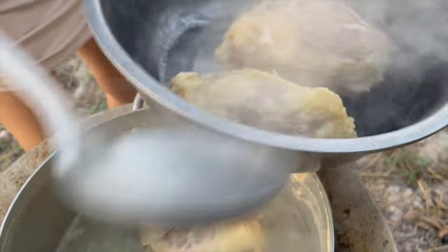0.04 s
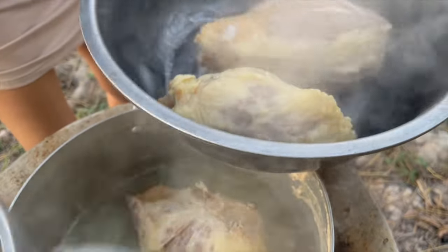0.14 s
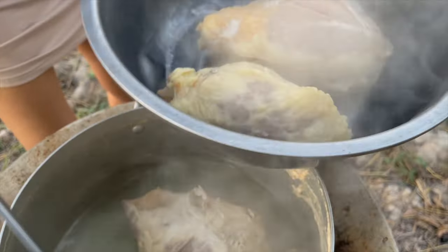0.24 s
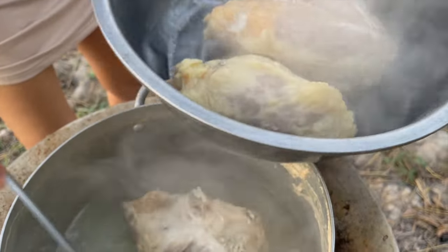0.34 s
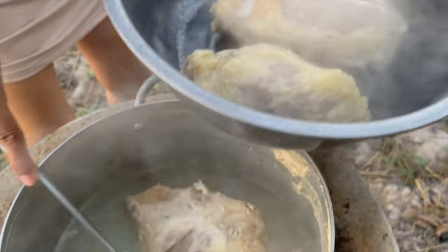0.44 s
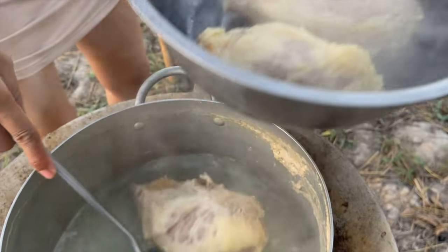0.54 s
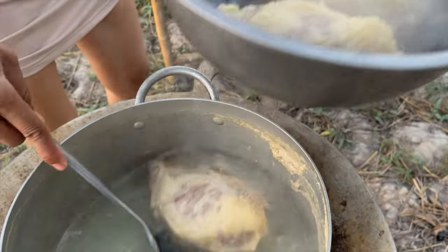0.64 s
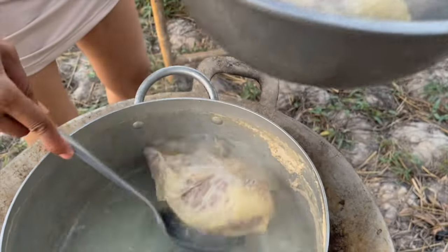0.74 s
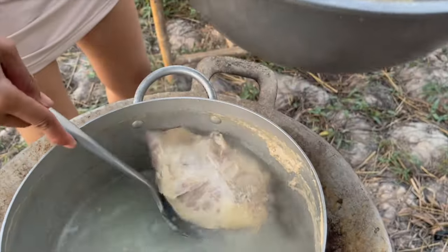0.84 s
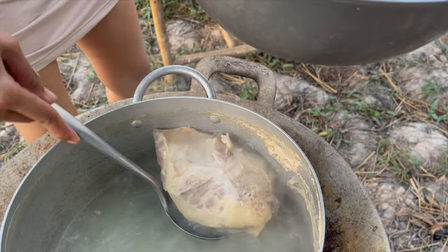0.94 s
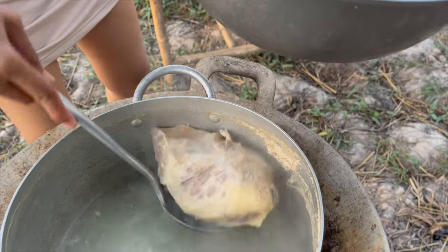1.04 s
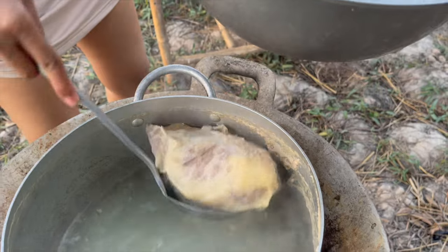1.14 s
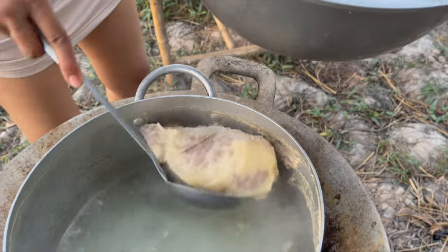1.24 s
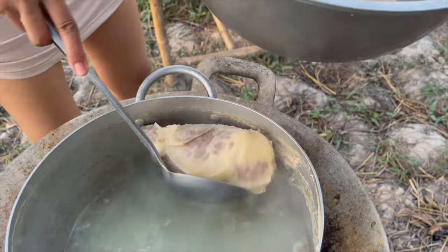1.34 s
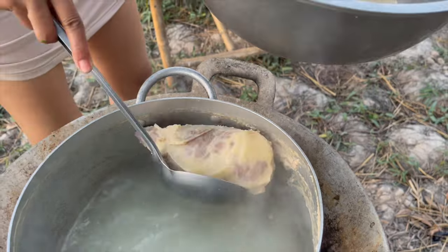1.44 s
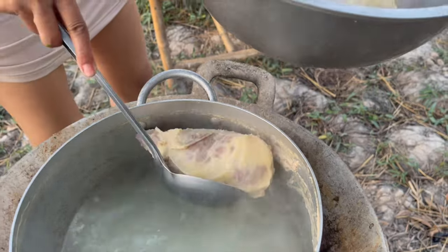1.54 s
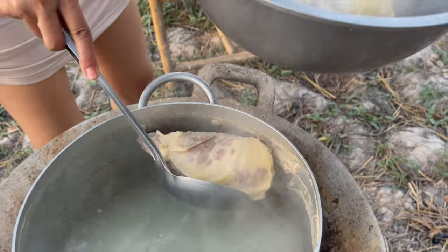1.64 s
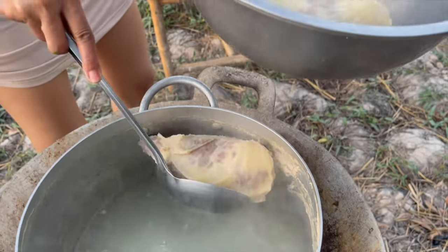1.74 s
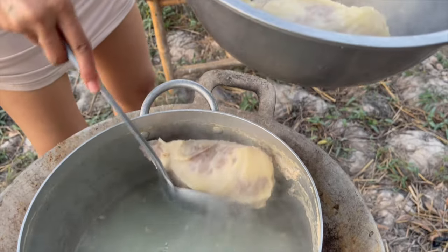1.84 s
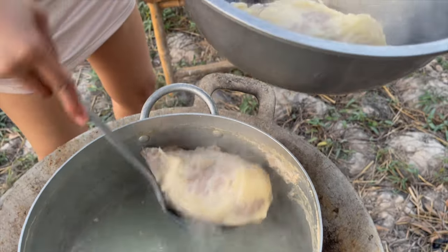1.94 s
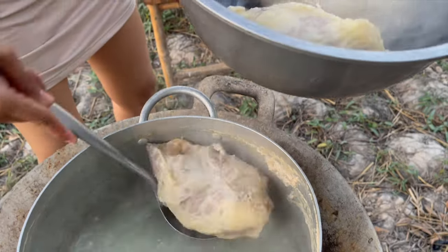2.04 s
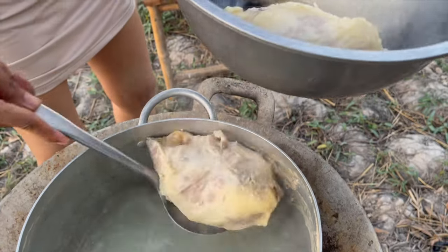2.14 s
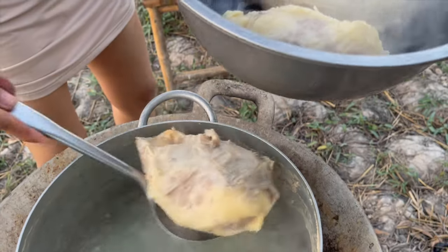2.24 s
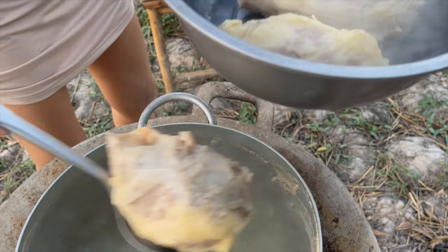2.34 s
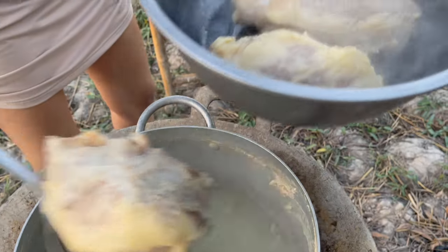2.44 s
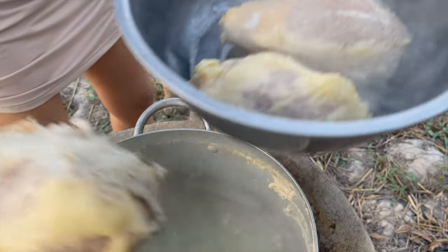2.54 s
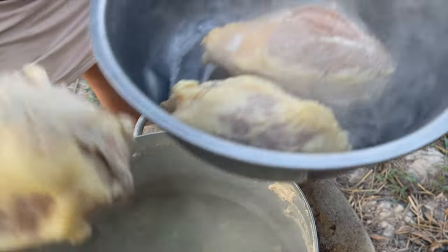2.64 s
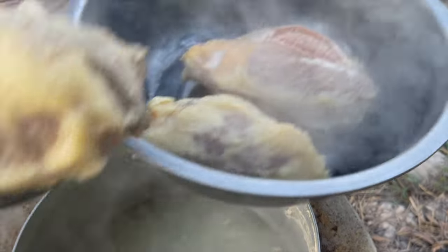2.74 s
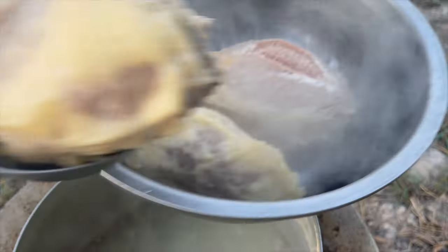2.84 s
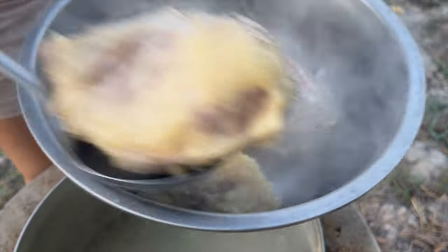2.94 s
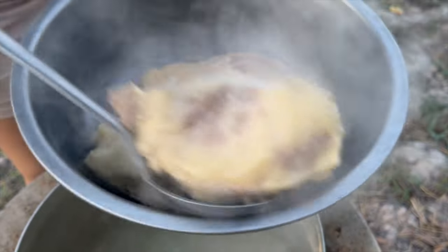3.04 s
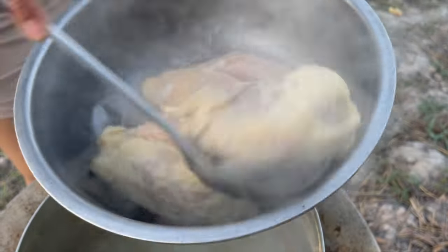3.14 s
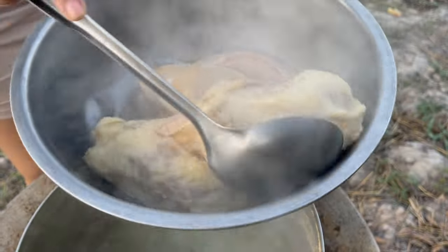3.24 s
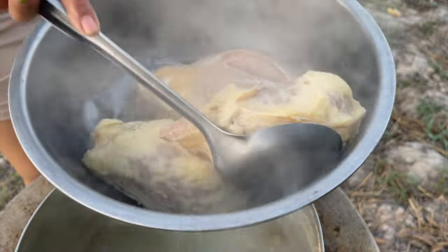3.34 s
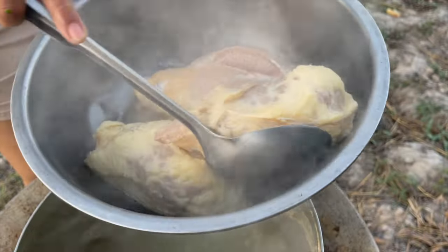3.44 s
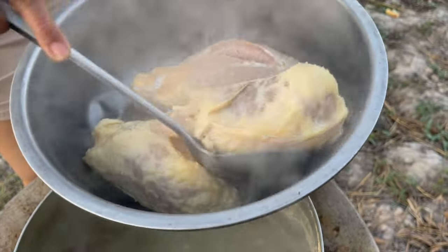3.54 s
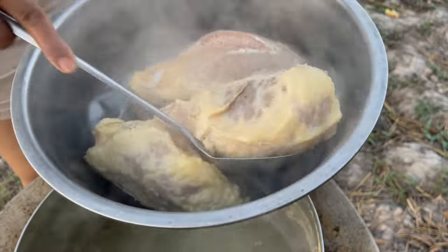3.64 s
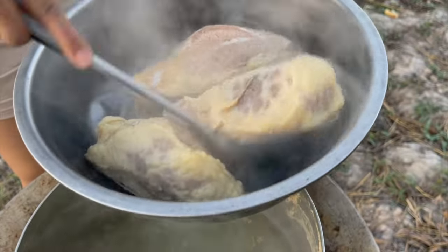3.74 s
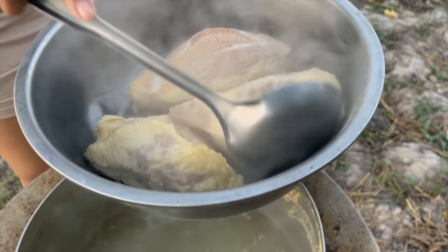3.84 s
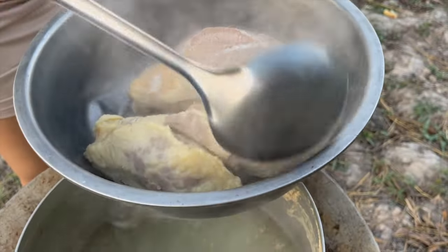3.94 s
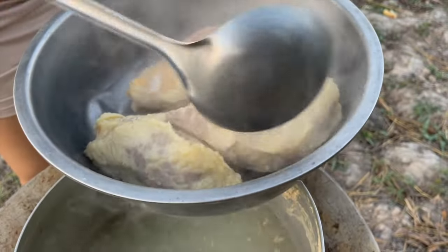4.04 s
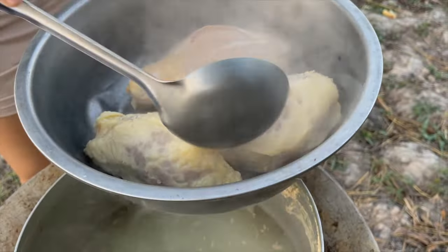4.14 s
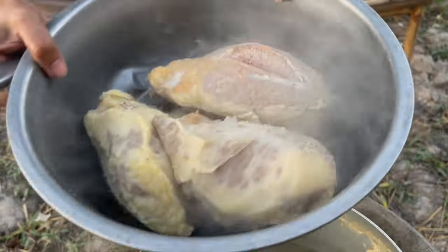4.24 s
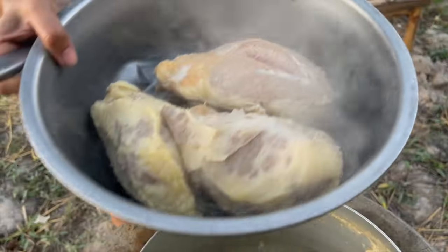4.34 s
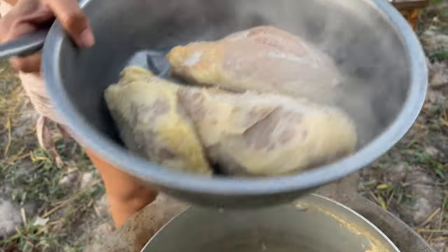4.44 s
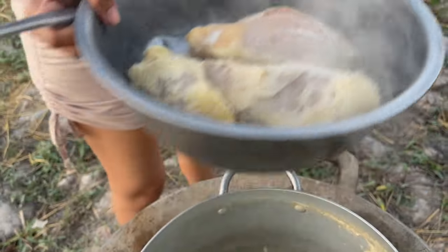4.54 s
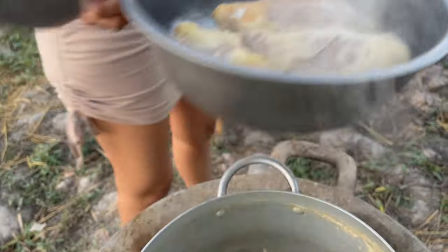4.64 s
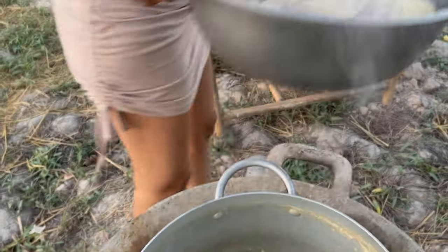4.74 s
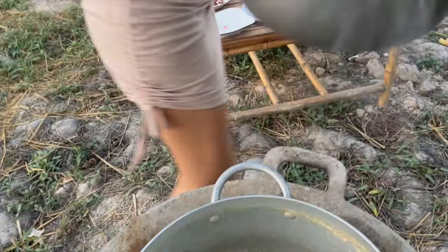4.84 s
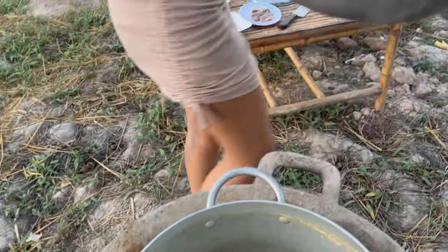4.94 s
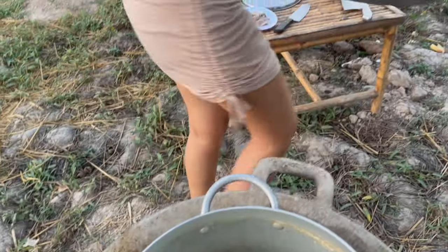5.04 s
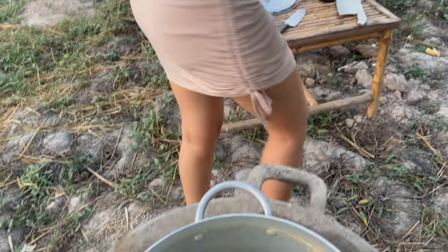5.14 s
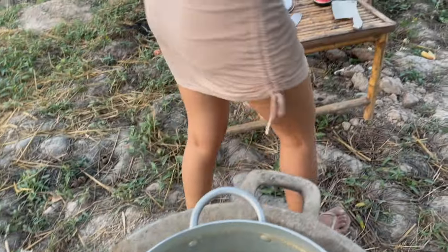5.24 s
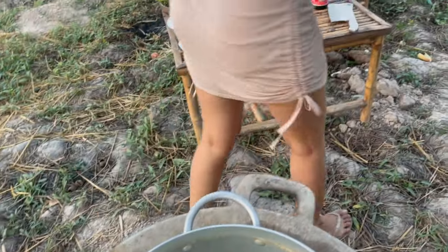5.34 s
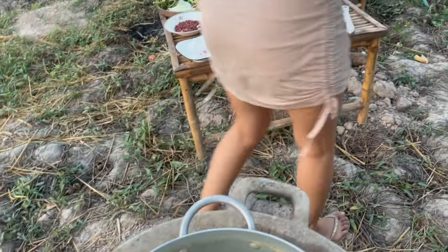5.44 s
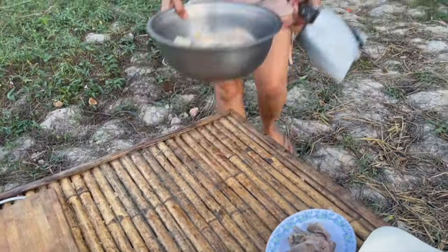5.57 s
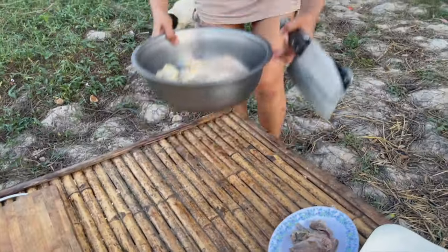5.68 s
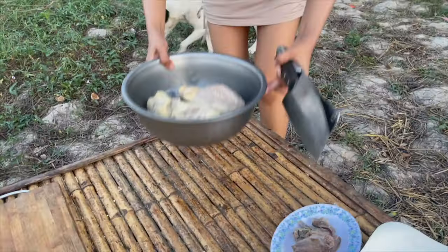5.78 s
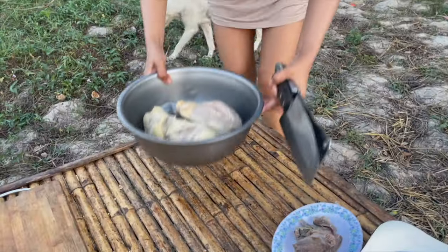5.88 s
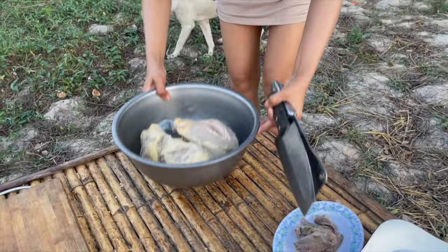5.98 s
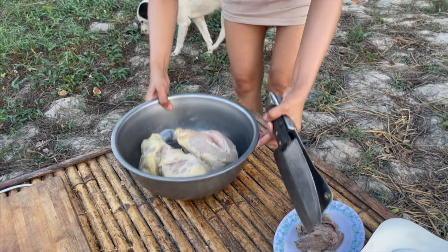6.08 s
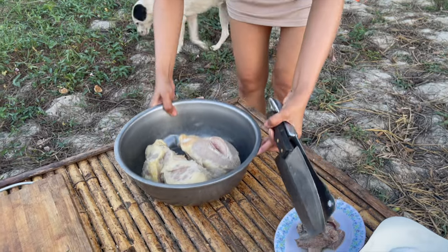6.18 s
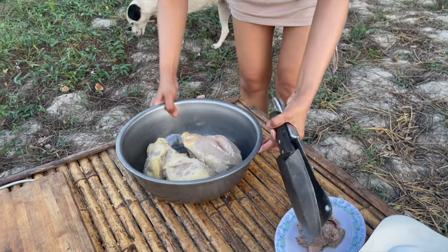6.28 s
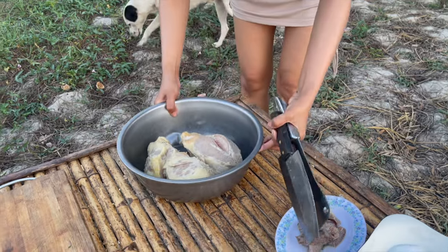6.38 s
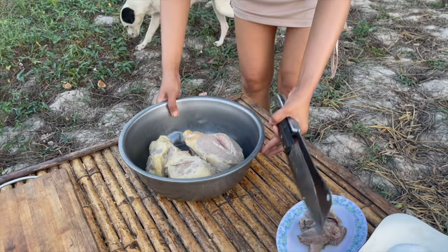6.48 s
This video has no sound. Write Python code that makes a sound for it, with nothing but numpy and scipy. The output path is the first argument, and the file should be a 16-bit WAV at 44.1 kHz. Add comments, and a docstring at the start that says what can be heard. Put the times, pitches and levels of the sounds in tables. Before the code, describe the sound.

In an open yard with shimmering insects, small birds and low rumble, a ladle touches a steel bowl, then stirs water with plopping bubbles and ticks on a pot wall. Drips sizzle briefly on a hot stove. Loud, meat-damped metal clonks and short scrapes follow, then soft crunching steps, an abrupt loss of background treble, and a bowl knocking down on bamboo. Close handheld phone, stereo.

```python
"""Outdoors, over insects, birds and a low rumble, a steel ladle touches a bowl, then fishes meat out of a pot:
it ticks on the pot wall while bubbles plop in stirred water, and soon drips spit and sizzle on the hot stove.
The ladle clonks into the steel bowl and skids, as noise, damped notes and ringing modes that the meat chokes;
sliding meat makes the bowl groan softly. Steps crunch on dry litter, the background's treble drops abruptly,
and the bowl is set on a bamboo table. A phone's two ports hear it; it limits loud knocks and ducks after them."""
import sys
import numpy as np
from scipy import signal
from scipy.fft import rfft, irfft, next_fast_len
from scipy.io import wavfile
from scipy.ndimage import uniform_filter1d, minimum_filter1d

SR = 44100
rng = np.random.default_rng(int(sys.argv[2]) if len(sys.argv) > 2 else 0)


def output_pcm(signal):
    """Save a mono or channel-first signal as 16-bit PCM at the path in sys.argv[1].

    Samples are clipped to [-1, 1] before scaling.
    """
    pcm = np.clip(np.atleast_2d(signal).T, -1, 1) * 32767
    wavfile.write(sys.argv[1], SR, np.round(pcm).astype(np.int16))


N = 287074
TIME = np.arange(N) / SR
AGE = TIME[:SR // 2]  # time since a blow
THROB_HZ = 135  # pulsing of the insect sounds


def undb(db):
    """Decibels to gain."""
    return 10 ** (np.asarray(db) / 20)


def unit(x):
    """Scale to rms 1."""
    return x / np.sqrt(np.mean(x ** 2))


def burst(x):
    """Scale a transient to the energy of 10 ms at rms 1."""
    return x / np.sqrt(np.sum(x ** 2) / (SR / 100))


def add(out, s, sound):
    """Mix a sound in at time s."""
    i = int(s * SR)
    out[i:i + len(sound)] += sound[:N - i]


def sine(hz):
    """Sine that follows a pitch given sample by sample."""
    return np.sin(2 * np.pi * np.cumsum(hz) / SR)


def fade(t60):
    """Exponential decay after a blow, 60 dB in t60 seconds."""
    return np.exp(-np.log(1000) * AGE / t60)


def envelope(s, attack_s, hold_s, t60):
    """Rise from time s, hold, then die away."""
    age = TIME - s
    decay = np.exp(-np.log(1000) * np.maximum(age - attack_s - hold_s, 0) / t60)
    return np.clip(age / attack_s, 0, 1) * decay


def over_hz(points, size):
    """A (Hz, value) table read on the bins of a transform, along log frequency."""
    hz, value = np.transpose(points)
    return np.interp(np.log(np.fft.rfftfreq(size, 1 / SR) + 1), np.log(hz), value)


def colour(x, points):
    """Causal minimum-phase filter with the given (Hz, dB) response, made by folding its cepstrum."""
    size = 2 * next_fast_len(len(x))
    cepstrum = irfft(np.log(undb(over_hz(points, size))))
    cepstrum[1:size // 2] *= 2
    cepstrum[size // 2 + 1:] = 0
    return irfft(rfft(x, size) * np.exp(rfft(cepstrum)))[:len(x)]


def band(x, hz, width):
    """Band-pass around hz."""
    low = np.hypot(hz, width / 2) - width / 2
    high = min(low + width, SR / 2 - 1000)
    return signal.sosfilt(signal.butter(2, [low, high], "band", fs=SR, output="sos"), x + 1e-18)


def walk(rate):
    """Slow random wander with rms 1, drawing new values rate times a second."""
    k = int(SR / rate)
    steps = np.repeat(rng.standard_normal(N // k + 1), k)
    return unit(uniform_filter1d(uniform_filter1d(steps, k), k)[:N])


def slips(rate, spread_db):
    """Tiny random contacts, rate a second, of uneven size."""
    happens = rng.random(N) < rate / SR
    return happens * rng.choice([-1, 1], N) * undb(spread_db * rng.standard_normal(N))


def outdoors():
    """Wavering rumble, open-air hiss and throbbing insect choruses; treble and choruses drop abruptly late on."""
    # Open air and distant rumble. Each row: frequency in Hz, colour in dB.
    air_colour = [(20, -41), (33, -19), (55, 2), (80, -0.5), (130, -8.5), (200, -19), (300, -21),
                  (500, -21), (1000, -29), (2000, -31.5), (5000, -34), (9000, -31), (12500, -61),
                  (14000, -64.5)]
    # Swells of the rumble below 130 Hz. Each row: time in seconds, gain in dB.
    rumble_swells = [(0, 2.5), (.9, 2), (1.5, 2.5), (1.8, -3.5), (2.1, 1), (2.7, -4), (3.1, -1.5), (3.4, 5),
                     (3.8, 2), (4.15, 1), (4.6, 0.5), (5.2, 0.5), (6.5, -1.5)]
    # Insect choruses. Each row: centre in Hz, width in Hz, level in dB, change in dB at the drop,
    # throb depth from 0 to 1.
    choruses = [(3214, 720, -71, -4.5, 0.05), (3470, 160, -75, -9, 0), (6660, 810, -71, -3, 0.02),
                (9000, 2200, -73, -5, 0.02), (10954, 810, -65.5, -8, 0.5)]
    drop_s, drop_length_s, air_db, air_change_db = 5.55, 0.0081, -52, -29
    dropped = np.clip((TIME - drop_s) / drop_length_s, 0, 1)

    air = undb(air_db) * unit(colour(rng.standard_normal(N), air_colour))
    high = signal.sosfilt(signal.butter(1, 3500, "high", fs=SR, output="sos"), air)
    low = signal.sosfiltfilt(signal.butter(2, 130, fs=SR, output="sos"), air)
    rumble = low * undb(np.interp(TIME, *np.transpose(rumble_swells)))
    out = (air - high - low + rumble) * undb(walk(8))  # wavers by about 1 dB
    out += high * undb(air_change_db * dropped)

    throb = sine(THROB_HZ * (1 + .03 * walk(5.6)))
    for hz, width, db, change_db, depth in choruses:
        level = undb(db + change_db * dropped + 0.98 * walk(4.6))
        out += level * (1 + depth * throb) * unit(band(rng.standard_normal(N), hz, width))
    return out


def far_birds(db, hz, spread_hz, fall_hz, length_s, count=16):
    """Random far calls as rows of start in seconds, length in seconds, start Hz, end Hz, level in dB."""
    rows = []
    for a, b, c, d in rng.random((count, 4)):
        start_hz = hz + spread_hz * (2 * c - 1)
        rows.append((a * N / SR, length_s * (.5 + b), start_hz, start_hz - fall_hz * d, db))
    return rows


def wildlife():
    """Short gliding bird whistles, near and far, and insect buzzes as noise bands pulsed by the wingbeat."""
    # The nearest bird. Each row: start in seconds, length in seconds, start pitch in Hz, end pitch in Hz, peak in dB.
    near_chirps = [(0.934, 0.072, 3330, 3280, -66), (1.003, .04, 3950, 3680, -65),
                   (1.124, 0.072, 3790, 3590, -65), (1.305, .04, 2920, 2840, -66),
                   (1.447, 0.035, 1660, 1880, -56), (1.495, 0.053, 3500, 3280, -64),
                   (1.564, 0.095, 3270, 2890, -61.5), (1.731, 0.08, 3170, 2620, -59.5),
                   (3.827, 0.065, 3580, 3500, -58), (3.947, 0.127, 3400, 3250, -63),
                   (4.774, 0.07, 3330, 2920, -61), (5.786, 0.16, 3310, 3185, -63),
                   (6.225, 0.14, 3280, 3170, -64.5)]
    # Birds farther off: level in dB, middle pitch and spread either way in Hz, largest fall in Hz,
    # average length in seconds.
    far_calls = dict(db=-67, hz=3260, spread_hz=230, fall_hz=218.8, length_s=0.15)
    # Nearer insects. Each row: start in seconds, length in seconds, level in dB, centre in Hz, width in Hz.
    buzz_rows = [(0.572, 0.2, -63, 3520, 220), (1.53, 0.22, -60, 7400, 300), (1.883, 0.23, -59, 7420, 300)]
    buzz_depth = 0.62
    out = np.zeros(N)
    for s, length, start_hz, end_hz, db in near_chirps + far_birds(**far_calls):
        n = int(length * SR)
        whistle = sine(np.linspace(start_hz, end_hz, n))
        add(out, s, undb(db) * signal.windows.tukey(n, .7) * whistle)
    for s, length, db, hz, width in buzz_rows:
        n = int(length * SR)
        wingbeat = 1 + buzz_depth * np.sin(2 * np.pi * THROB_HZ * TIME[:n])
        buzz = unit(wingbeat * band(rng.standard_normal(n), hz, width))
        add(out, s, undb(db) * signal.windows.tukey(n, .6) * buzz)
    return out


def footsteps(rate=1000, spread_db=4.5):
    """Dry litter crunches under each step: small snaps over a soft rustle, swelling with the press of the foot."""
    # Each row: start in seconds, length in seconds, level in dB, centre in Hz.
    step_rows = [(4.452, 0.094, -55, 760), (5.04, 0.14, -60.5, 1390), (5.129, 0.074, -59.5, 1050),
                 (5.283, 0.069, -57.5, 2300), (5.436, 0.084, -65, 1570), (5.52, 0.38, -57.5, 1850),
                 (5.739, 0.061, -57, 600)]
    out = np.zeros(N)
    grains = unit(slips(rate, spread_db)) + rng.standard_normal(N)
    for s, length, db, hz in step_rows:
        press = np.sin(np.pi * np.clip((TIME - s) / length, 0, 1))
        out += undb(db) * press * unit(band(grains, hz, 0.78 * hz))
    return out


def crack(t60, snap_db=5, snap_t60=0.0013, tail_db=-35, tail_t60=0.49, rise=0.0012):
    """Countless dense modes as noise: a snap at contact, their decay, and faint scatter from the surroundings."""
    shape = fade(t60) + undb(snap_db) * fade(snap_t60) + undb(tail_db) * fade(tail_t60)
    return burst(rng.standard_normal(len(AGE)) * shape * (1 - np.exp(-AGE / rise)))


def ticks():
    """Small dull contacts: band-passed cracks."""
    # Light handling and dry litter underfoot. Each row: start in seconds, level in dB, centre in Hz, t60 in seconds.
    tick_rows = [(0.0885, -46.5, 10100, 0.011), (.303, -58, 10500, .015), (0.383, -55, 8000, 0.012),
                 (2.258, -58.5, 4800, 0.018), (3.816, -50, 2360, 0.12), (4.212, -47.5, 496, 0.0056),
                 (5.021, -41.5, 1090, 0.038), (5.022, -51, 2070, 0.024), (5.105, -54.5, 1200, .03),
                 (5.152, -53, 1400, 0.037), (5.158, -53.5, 649, .04), (5.318, -55.5, 2300, .015),
                 (5.455, -56.5, 1510, .02), (5.722, -56, 2204, .02), (5.52, -61, 1390, .015)]
    out = np.zeros(N)
    for s, db, hz, t60 in tick_rows:
        add(out, s, undb(db) * burst(band(crack(t60), hz, 0.59 * hz)))
    return out


def stove(grain_db=3.0):
    """Drips spit on hot metal as sharp cracks; a dribble boils away in a fine crackle and dries."""
    # The loudest spits. Each row: start in seconds, level in dB before the colour and make-up gain.
    spit_rows = [(2.751, -35), (2.7735, -40), (2.823, -41.5), (2.8554, -39.5), (2.878, -38.5)]
    # Colour of spits and sizzle. Each row: frequency in Hz, gain in dB.
    sizzle_colour = [(200, -21.5), (1000, -18), (2500, -12), (5000, -5), (7000, -5.5), (8200, 1),
                     (11500, -8), (13500, -13.5), (16000, -28.5)]
    makeup_db = 8.5
    # level before colour and make-up
    boil = undb(-38.5) * envelope(2.735, attack_s=0.029, hold_s=0.014, t60=0.31)
    out = boil * unit(rng.standard_normal(N) * undb(grain_db * walk(900)))
    for s, db in spit_rows:
        add(out, s, undb(db) * crack(0.0049))
    return undb(makeup_db) * colour(out, sizzle_colour)


def small_bubbles(from_s, to_s, db, hz, spread_octaves, count=26):
    """Random bubbles as rows of start in seconds, level in dB, pitch in Hz."""
    return [(from_s + (to_s - from_s) * a, db + 4 * (2 * b - 1), hz * 2 ** (spread_octaves * (2 * c - 1)))
            for a, b, c in rng.random((count, 3))]


def water(cycles=9, glide=0.2, splash_db=-14):
    """Bubbles ring for a few cycles and rise in pitch over the soft wash of stirred water."""
    # Larger air pockets closing around the ladle. Each row: start in seconds, level in dB, starting pitch in Hz.
    plop_rows = [(.329, -38.5, 410), (0.382, -32.5, 504), (.426, -36, 402), (.677, -45.5, 430),
                 (.835, -26, 1350), (.937, -38.5, 1280), (0.965, -38, 974), (1.016, -41.5, 1070),
                 (1.031, -38.5, 523), (1.057, -32.5, 884), (1.063, -35, 1350), (1.088, -48.5, 1880),
                 (1.138, -47, 1050), (1.15, -39.5, 1240), (1.162, -35.5, 646), (1.259, -51, 1550),
                 (1.399, -51, 1230), (1.99, -49, 1250)]
    # Small bubbles while the ladle is under water: first and last time in seconds, middle level in dB,
    # middle pitch in Hz, spread either way in octaves.
    bubble_cloud = dict(from_s=0.12, to_s=1.2, db=-48.5, hz=946, spread_octaves=1.1)
    # Strokes of the ladle through the water. Each row: strongest push in seconds, level in dB.
    stroke_rows = [(.21, -51.5), (.58, -57.5)]
    rise_s, stroke_t60, hiss_db = 0.17, 1.22, -6
    out = np.zeros(N)
    for s, db, hz in plop_rows + small_bubbles(**bubble_cloud):
        t60 = cycles / hz + 0.015
        pitch = hz * (1 + glide * np.minimum(AGE / t60, 1))
        bubble = sine(pitch) * fade(t60) * (1 - np.exp(-AGE / 0.00055))
        splash = burst(band(crack(0.0094), 0.84 * hz, 0.82 * hz))
        add(out, s + 0.00117, undb(db) * (bubble + undb(splash_db) * splash))
    stir = sum(undb(db) * envelope(s - rise_s, rise_s, 0, stroke_t60) for s, db in stroke_rows)
    wash = unit(band(rng.standard_normal(N), 370, 570) * undb(3.7 * walk(65.3)))
    hiss = unit(band(rng.standard_normal(N), 4200, 6900))
    return out + stir * (wash + undb(hiss_db) * hiss)


def sheet(t60, count=90, stretch=0.91):
    """The crowded upper modes of thin metal, each dying at its own pace."""
    age = AGE[:SR // 6]
    hz = rng.uniform(900, 12500, count)
    pace = np.exp(0.2 * rng.standard_normal(count))
    sign = rng.choice([-1., 1.], count)
    decays = np.exp(np.outer(-np.log(1000) * pace / (stretch * t60), age))
    waves = decays * np.sin(2 * np.pi * np.outer(hz, age))
    return burst(np.pad(sign @ waves, (0, len(AGE) - len(age))))


def note(hz, db, swell_s, swell_power, sag=.03):
    """A strongly damped note that swells and dies, the sooner the higher it is; its pitch sags as contact eases."""
    swell_fall = 0.6  # swell_s holds at 500 Hz and shortens with pitch by this power
    u = AGE / (swell_s * (500 / hz) ** swell_fall)
    pitch = hz * (1 + sag * np.tanh(1 - u / 2))
    return undb(db) * (u * np.exp(1 - u)) ** swell_power * sine(pitch)


def ring(modes, db, tilt_db, woken, scatter_db=2.5, split=0.006, twin_db=-10, wobble=0.0055, rattle_db=2.0):
    """Free ring as decaying modes, each with a beating twin as in dented round metal."""
    chance = rng.standard_normal((len(modes), 3))
    # the pressure on the struck thing wavers, and pitch and level with it
    press = np.interp(AGE, np.linspace(0, AGE[-1], 70), rng.standard_normal(70))
    clock = AGE + wobble * np.cumsum(press) / SR
    out = 0
    for (hz, mode_db, t60), (a, b, c) in zip(modes, chance):
        if hz in woken:  # the struck spot sets these modes' level, in step with the push
            size_db, sign = woken[hz], 1
        else:  # tilt_db is per octave above 1500 Hz
            size_db = db + mode_db + scatter_db * a + tilt_db * np.log2(max(hz / 1500, 1))
            sign = np.sign(c)
        twin = np.sin(2 * np.pi * (hz * (1 + split * b) * AGE + c))
        pair = np.sin(2 * np.pi * hz * clock) + undb(twin_db) * twin
        out = out + undb(size_db) * fade(t60) * sign * pair
    return out * undb(rattle_db * press)


def choke(s):
    """What is left of a sound begun at s as ladle or meat comes to rest on the steel and damps it."""
    # Each row: time of coming to rest in seconds, t60 of the damping in seconds.
    rests = [(3.084, 0.17), (3.165, 0.23), (3.522, 0.109), (3.765, 0.26)]
    left = np.ones(len(AGE))
    for rest_s, t60 in rests:
        if rest_s > s:
            left = left * np.exp(-np.log(1000) * np.maximum(s + AGE - rest_s, 0) / t60)
    return left


def blows(hits, contact_colour, vessel, swell_power, metal, ladle_db=None, hardness=0.23):
    """Each contact: its noise, two strongly damped notes, and the ring of vessel and perhaps ladle."""
    # Ring of the ladle. Each row: mode in Hz, relative level in dB, t60 in seconds.
    ladle = [(304, -11.5, 0.056), (400, -4.5, 0.17), (463, -10, 0.15), (491, -5, .12), (657.4, -7, 0.097),
             (785, -8.5, .09), (877, -4, .14), (976, -5.5, 0.12), (1044, -5.5, .11), (1220, -10.5, .11),
             (1683, -13.5, 0.11), (1835, -13, 0.095), (1940, -17, .13), (2110, -17, .09), (2350, -13, .08),
             (2775, -21, 0.21), (3100, -20.5, .13), (3700, -19.5, .08), (4490, -22.5, 0.083),
             (4850, -19.5, 0.13), (5080, -19, .1), (5631, -13.5, 0.092), (5929, -16, .1),
             (6230, -16.5, 0.11), (7200, -20.5, 0.083), (8035, -17.5, 0.064)]
    bright_from_hz, bright_full_hz = 750, 5700  # a harder contact lifts the treble over this range
    out = np.zeros(N)
    mode_hz = np.array([mode[0] for mode in (vessel if ladle_db is None else vessel + ladle)])
    for s, db, bright_db, t60, note_hz, note_db, swell_s, second_hz, second_db, vessel_db, spot in hits:
        contact = np.sqrt(1 - metal) * crack(t60) + np.sqrt(metal) * sheet(t60)
        contact = colour(contact, contact_colour)
        contact = colour(contact, [(bright_from_hz, db), (bright_full_hz, db + bright_db)])
        clonk = note(note_hz, note_db, swell_s, swell_power) + note(second_hz, second_db, swell_s, swell_power)
        # each frequency of the struck spot wakes the nearest mode
        woken = {mode_hz[np.argmin(np.abs(mode_hz - hz))]: size_db for hz, size_db in spot}
        # a hard, bright contact wakes more of the high modes
        tilt_db = hardness * (bright_db + np.interp(bright_full_hz, *np.transpose(contact_colour)))
        ringing = ring(vessel, vessel_db, tilt_db, woken)
        if ladle_db is not None:  # out of the water the ladle rings too, following the contact's level
            ringing = ringing + ring(ladle, db + ladle_db, tilt_db, woken)
        add(out, s, clonk + (contact + ringing) * choke(s))
    return out


def bowl_on_table():
    """The bowl is set down on bamboo: mostly noisy contacts over short, low slat modes."""
    # Each row: start in seconds, contact level in dB, brightness in dB, contact t60 in seconds, note in Hz,
    # note level in dB, note swell in seconds at 500 Hz, second note in Hz, its level in dB, slat ring in dB,
    # then the modes the struck spot wakes most as pairs of Hz and dB.
    table_hits = [(6.061, -42, -15, .03, 1440, -43, 0.0074, 300, -49.5, -69.5, []),
                  (6.0675, -28, -13, 0.025, 1126, -31.5, 0.0032, 2130, -40, -63, []),
                  (6.1595, -21, 12, 0.033, 188.4, -25.5, 0.0029, 684, -22, -53, []),
                  (6.1675, -19.5, 7, 0.031, 2150, -25, 0.0027, 218, -23.5, -37, []),
                  (6.181, -16, 7.5, 0.048, 240, -28, 0.0023, 2070, -32, -34.5, []),
                  (6.193, -15.5, -4, 0.056, 203, -28, 0.0032, 860, -28, -41.5, [(557, -32.5)]),
                  (6.275, -29.5, -3.5, 0.054, 683, -33.5, 0.0054, 242, -43, -49.5, [(1540, -48),
                  (1950, -44), (3270, -46)])]
    # Contact noise. Each row: frequency in Hz, gain in dB.
    table_colour = [(70, -15.5), (270, 3), (1150, -4), (3100, -9), (5700, -22), (9800, -30.5), (12300, -42),
                    (14000, -63)]
    # Bamboo slats. Each row: mode in Hz, relative level in dB, t60 in seconds.
    slats = [(205, 11, 0.079), (246, 7, 0.089), (560.4, -2, 0.18), (648, -0.5, 0.18), (790, 10, 0.065),
             (984, 0.5, 0.12), (1550, -11, 0.15), (1950, 4, 0.057), (2300, -0.5, 0.047), (3290, 0, 0.057)]
    return blows(table_hits, table_colour, slats, swell_power=1.0, metal=0.072)


def ladle_on_pot():
    """The ladle ticks on the pot wall: short contacts wake the pot's modes."""
    # Each row: start in seconds, contact level in dB, brightness in dB, contact t60 in seconds, note in Hz,
    # note level in dB, note swell in seconds at 500 Hz, second note in Hz, its level in dB, pot ring in dB,
    # then the modes the struck spot wakes most as pairs of Hz and dB.
    pot_hits = [(.498, -32.5, 11, 0.021, 3500, -34, 0.0027, 760, -45, -52, [(710, -30), (1598, -44),
                (3394, -39), (3510, -28.5)]), (.507, -32, -5, 0.02, 3360, -29, .003, 327, -45, -62, []),
                (.8212, -31, -1.5, 0.016, 3660, -25.5, 0.0018, 940, -42, -45, []),
                (.866, -23, -3, 0.031, 4450, -16.5, 0.0032, 1430, -27, -40, [(627, -36.5), (2790, -41),
                (3020, -30.5)]), (1.2955, -45, -5, 0.015, 1310, -41.5, 0.0024, 2120, -45, -62, []),
                (1.953, -54, -3, .02, 1500, -53, 0.0067, 4300, -60, -71, []),
                (2.007, -30.5, 9, 0.031, 1464, -25.5, 0.0048, 6640, -18, -48, [(1480, -28), (4470, -34),
                (5046, -28), (6600, -29.5)]),
                (2.029, -33, -1, 0.049, 1340, -43, 0.0034, 4430, -38, -54, [(6600, -35)])]
    # Contact noise. Each row: frequency in Hz, gain in dB.
    pot_colour = [(70, -21), (270, 5), (1150, 0), (3100, -5), (5700, 0.5), (9800, -4), (12300, -14),
                  (14000, -27.5)]
    # Pot wall. Each row: mode in Hz, relative level in dB, t60 in seconds.
    pot_modes = [(606, -5, 0.088), (700, -4, 0.094), (1125, 4.5, 0.108), (1484, -29, 0.086),
                 (1590, -11.5, 0.23), (2790, -13, 0.12), (3024, 4.5, 0.049), (3397, -5, 0.052),
                 (3510, -20.5, 0.089), (3973, 8.5, 0.04), (4480, -4, 0.083), (5113, 4, .065),
                 (6740, -19, 0.031)]
    return blows(pot_hits, pot_colour, pot_modes, swell_power=0.84, metal=0.29)


def scrapes(rate=900, spread_db=4, hz=6400, width_hz=3200, t60=0.063):
    """The ladle skids on the bowl: stick and slip keep the thin metal's upper modes going."""
    # Each row: start in seconds, length in seconds, level in dB, fall over the skid in dB.
    skid_rows = [(3.046, 0.051, -32.5, 13), (3.729, 0.042, -43.5, -3), (3.878, 0.033, -37.5, 6.5)]
    out = np.zeros(N)
    chatter = band(signal.fftconvolve(slips(rate, spread_db), sheet(t60))[:N], hz, width_hz)
    for s, length, db, fall_db in skid_rows:
        skid = chatter[int(s * SR):int((s + length) * SR)]
        fall = undb(np.linspace(0, -fall_db, len(skid)))
        add(out, s, undb(db) * unit(skid * signal.windows.tukey(len(skid), .3) * fall))
    return out


def bowl_clonks_and_groans():
    """The ladle clonks on the steel bowl, which also groans softly as meat slides in it: damped notes and ring."""
    # Clonks, and at 3.795 and 3.857 s soft groans. Each row: start in seconds, contact level in dB,
    # brightness in dB, contact t60 in seconds, note in Hz, note level in dB, note swell in seconds at 500 Hz,
    # second note in Hz, its level in dB, rim ring in dB, then the modes woken most as pairs of Hz and dB.
    bowl_rows = [(0.0, -29, 11.5, 0.08, 680, -38, .0053, 2270, -45, -33, [(581, -34), (1310, -41),
                 (1490, -34.5), (1540, -35.5), (1690, -39), (1876, -28.5), (1980, -38), (2169, -36.5),
                 (2649, -36)]), (3.013, -8, -14.5, 0.062, 498, -6, 0.0036, 892, -10, -44.5, [(400, -26.5),
                 (581, -25), (1144, -33.5), (1540, -38.5)]),
                 (3.0437, -9, 3, 0.038, 1823, -6.5, .0058, 3810, -15, -44.5, [(491, -28.5), (1310, -32.5),
                 (1540, -32.5), (1841, -13.5), (1980, -24.5), (2649, -31.5), (3149, -34), (3700, -28),
                 (5631, -24.5), (5929, -26)]),
                 (3.1263, -1, -8.5, 0.061, 590.5, 1.5, 0.0051, 910, -16, -49, [(400, -26), (581, -30),
                 (882, -15), (1375, -36.5), (1540, -30.5), (2350, -47), (2765, -34.5), (3149, -40),
                 (3700, -42.5), (4490, -34.5)]),
                 (3.262, -49.5, 5.5, .03, 5300, -43, .008, 1000, -60, -66, [(581, -51.5), (1876, -50),
                 (2649, -55)]), (3.3375, -43, 18, 0.083, 4850, -37, 0.01, 945, -48, -59, []),
                 (3.423, -5.5, -9, 0.044, 584, -2.5, 0.0045, 1055, -18.5, -51, [(310, -23), (581, -24),
                 (678, -27.5), (870, -24.5), (1310, -40.5), (1540, -28), (1674, -29.5), (1980, -38.5),
                 (2765, -44.5)]), (3.474, -51, -12.5, .04, 480, -40, 0.0082, 860, -40, -71, []),
                 (3.521, -22.5, -33, 0.021, 566.4, -25, 0.0031, 898, -32, -69, []),
                 (3.529, -30, -26, .035, 423, -36.5, 0.0034, 774, -42, -75, []),
                 (3.683, -9.5, 2, 0.047, 490, -10, .0062, 5640, -15, -55, [(491, -27), (780, -26.5),
                 (870, -29), (966, -24), (1060, -30), (1690, -33), (1980, -41), (1375, -33.5),
                 (2300, -25.5), (2385, -33), (4860, -39), (5631, -33.5), (6190, -33), (8035, -29)]),
                 (3.738, -28.5, 6, 0.06, 496, -29.5, 0.0063, 900, -37, -66, [(491, -39), (2385, -42)]),
                 (3.746, -32, 14.5, 0.055, 4940, -24, .0053, 2540, -32.5, -48, [(2649, -40),
                 (7400, -33.5)]), (3.795, -39, -4, .06, 478, -41.5, 0.009, 995, -51, -75, []),
                 (3.857, -49, -13, .06, 475, -42.5, 0.012, 410, -46.5, -69, []),
                 (3.881, -35, 14.5, 0.091, 6460, -35, 0.008, 933, -38.5, -57, [(1876, -42.5), (2385, -54),
                 (2649, -50)])]
    # Contact noise. Each row: frequency in Hz, gain in dB.
    bowl_colour = [(70, -21.5), (270, -0.5), (1150, 1.5), (3100, -13), (5700, -7), (9800, -15),
                   (12300, -18.5), (14000, -31.5)]
    # Bowl rim. Each row: mode in Hz, relative level in dB, t60 in seconds.
    rim = [(586, -0.5, .16), (690, -5, 0.14), (1146, -10.5, 0.35), (1308, -8.5, 0.36), (1363, -10.5, 0.23),
           (1496, -2.5, .25), (1549, -4.5, 0.24), (1885, -1.5, 0.099), (2180, -8, 0.13), (2385, -11, 0.13),
           (2649, -4, 0.12), (3470, -14.5, .25), (4460, -14, .2), (4800, -9.5, 0.11), (5007, -14, .12),
           (7100, -11.5, .1)]
    return blows(bowl_rows, bowl_colour, rim, swell_power=1.6, metal=0.35, ladle_db=-23.0)


def ports(x):
    """Two ports on a phone: level and phase between them vary with pitch, the left mostly louder."""
    # Each row: frequency in Hz, left minus right in dB.
    balance = [(60, 5.5), (200, 8.5), (400, 5), (1200, 6), (2400, 5.5), (4400, 6), (8000, 4), (12000, -1.5)]
    # Each row: frequency in Hz, phase by which the left leads in radians.
    lead = [(100, 0), (2400, .25), (3200, .7), (4200, .35), (7500, .5), (8900, -.2), (10050, -3.1),
            (11300, -5.9), (12700, -6.9), (13600, -9.4), (14900, -12.3)]
    half = undb(over_hz(balance, N) / 2) * np.exp(1j * over_hz(lead, N) / 2)
    return np.array([irfft(rfft(x) * half, N), irfft(rfft(x) / half, N)])


def scatter(x, db=-13, t60=0.0034, shift_rate=5, hz=2400):
    """Reflections from pot, bowl and ground reach each port by different short paths that slowly shift."""
    paths = [band(rng.standard_normal(len(AGE)), hz, 11000) * fade(t60) for _ in range(4)]
    heard = np.array([signal.oaconvolve(x, p / np.sqrt(np.sum(p ** 2)))[:N] for p in paths])
    turn = walk(shift_rate)
    return undb(db) * (heard[:2] * np.cos(turn) + heard[2:] * np.sin(turn))


def scene():
    """Kitchen work close by, over the sounds of the yard."""
    # sound from all round the yard differs between the ports: opposite signs left and right
    yard = undb(-3.0) * band(outdoors(), 2500, 7000) + undb(-20.5) * outdoors()
    diffuse = yard * np.array([[1], [-1]])
    near = footsteps() + ticks() + stove() + water()
    near = near + bowl_on_table() + ladle_on_pot() + scrapes() + bowl_clonks_and_groans()
    return ports(near + wildlife() + outdoors()) + scatter(near) + diffuse


def held_excess(x, threshold, release_s):
    """Log of the peak over a threshold, held and released exponentially."""
    over = np.log(np.maximum(np.abs(x).max(axis=0) / threshold, 1))
    clock = TIME / release_s
    return np.maximum.accumulate(over * np.exp(clock)) * np.exp(-clock)


def limiter(x, ceiling=1.0, release_s=0.049):
    """Gain drops around a peak over the ceiling, within a 45-sample window, and then recovers."""
    gain = np.exp(-held_excess(x, ceiling, release_s))
    return x * uniform_filter1d(minimum_filter1d(gain, size=45), size=45)


def duck(x, threshold_db=-10, strength=0.21, release_s=0.12):
    """Slow gain control: eases the gain down just after a loud knock and lets it creep back."""
    held = held_excess(x, undb(threshold_db), release_s)
    return x * np.exp(-strength * signal.sosfilt(signal.butter(1, 4, fs=SR, output="sos"), held))


def record(dry):
    """The phone thins the deepest bass, limits the loudest knocks, ducks after them and cuts the top."""
    top_hz = 16300
    thin = signal.sosfilt(signal.butter(4, 34, "high", fs=SR, output="sos"), dry)
    levelled = duck(limiter(thin))
    return signal.sosfilt(signal.ellip(8, .2, 70, top_hz, fs=SR, output="sos"), levelled)


dry = scene()
out = record(dry)
output_pcm(out)
```